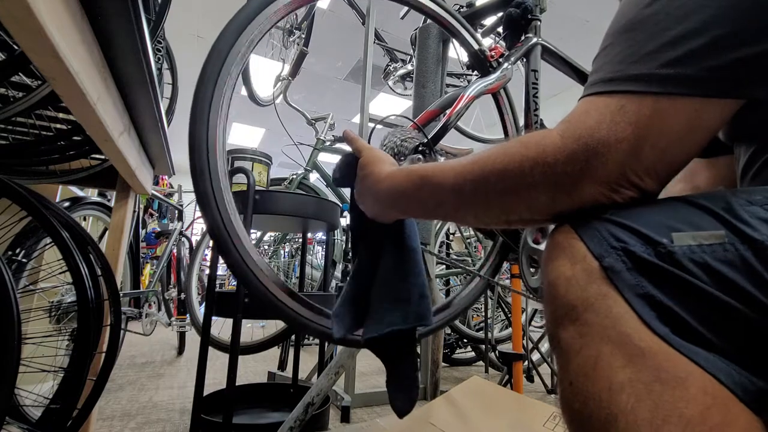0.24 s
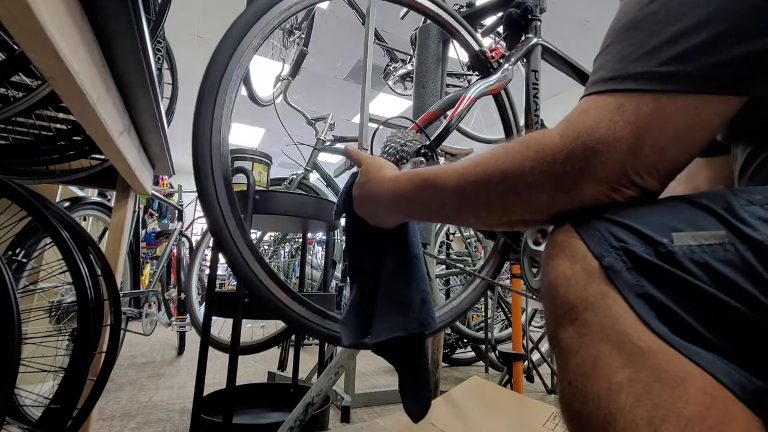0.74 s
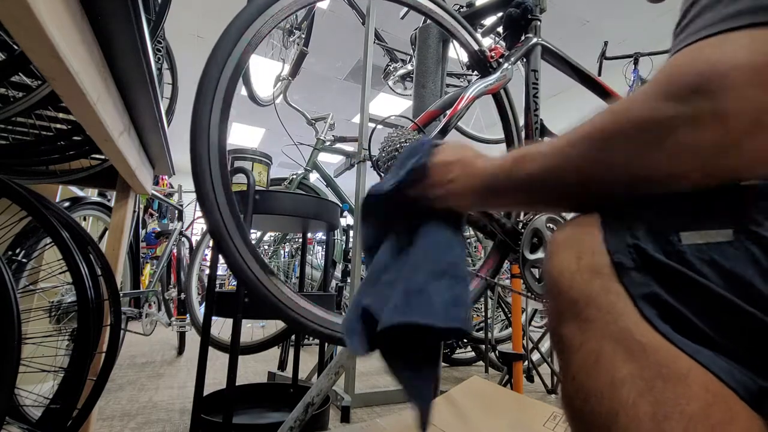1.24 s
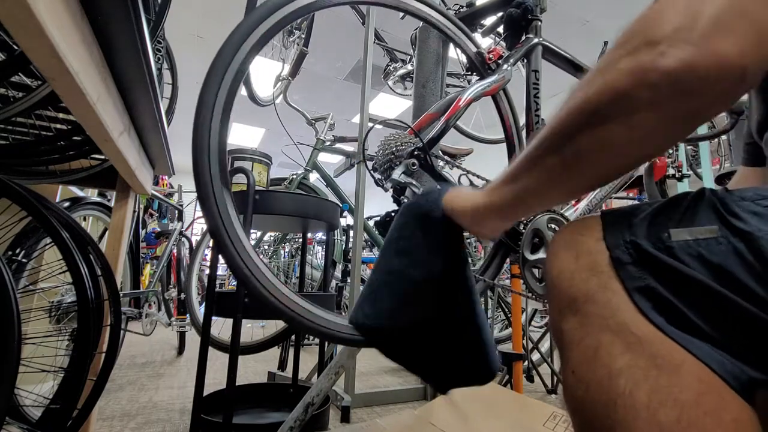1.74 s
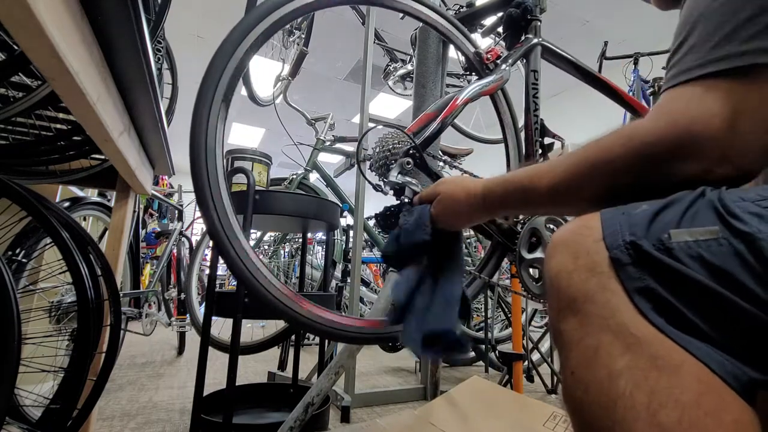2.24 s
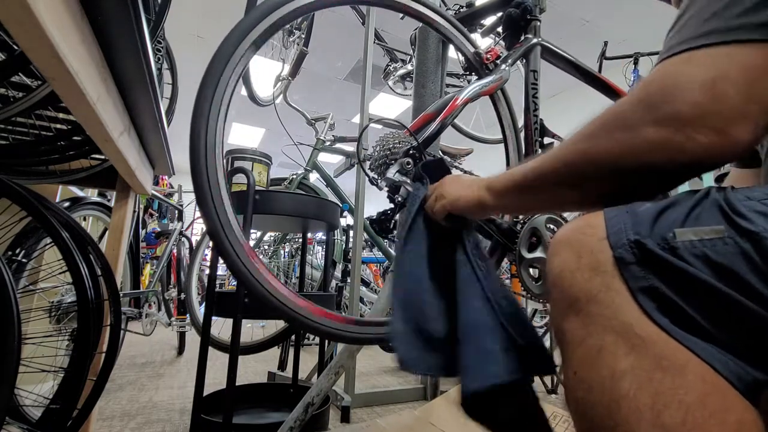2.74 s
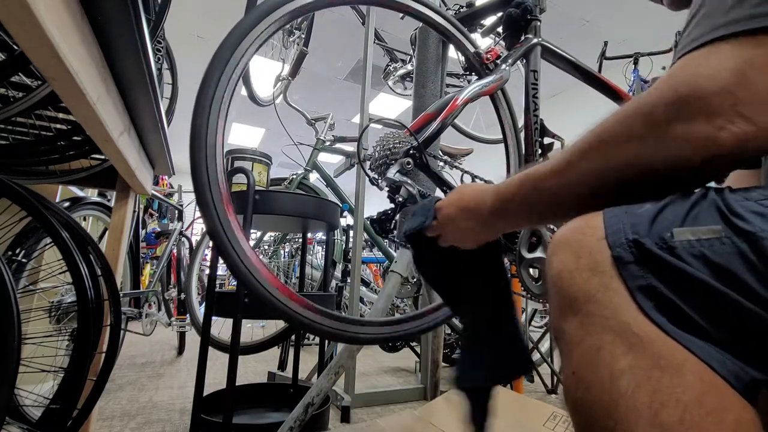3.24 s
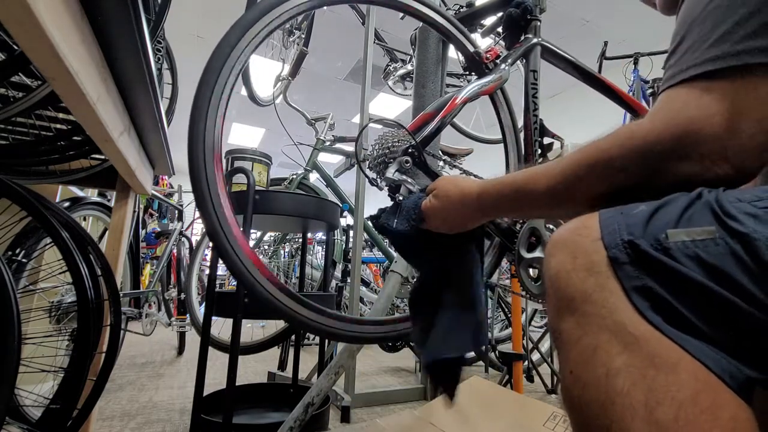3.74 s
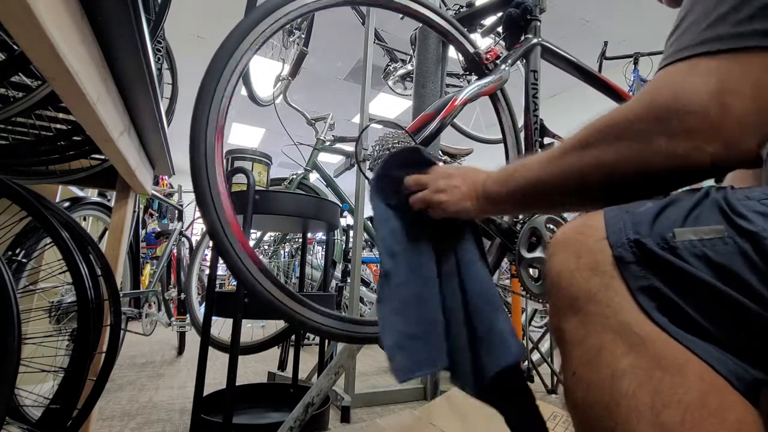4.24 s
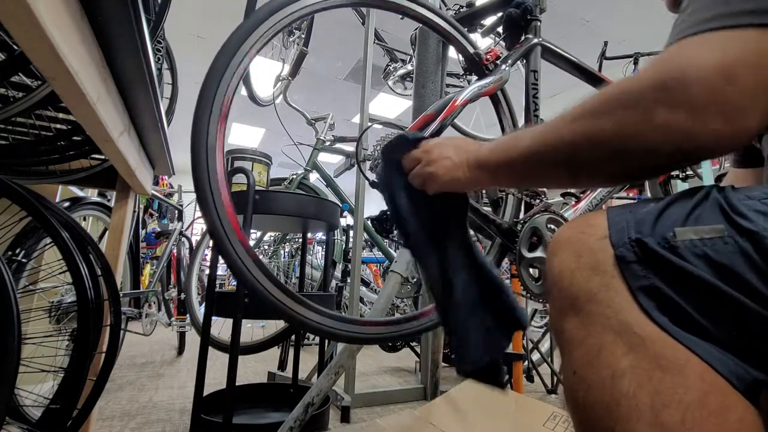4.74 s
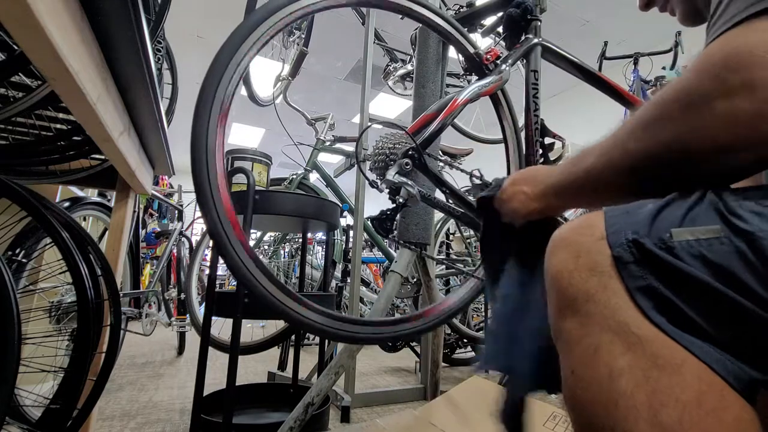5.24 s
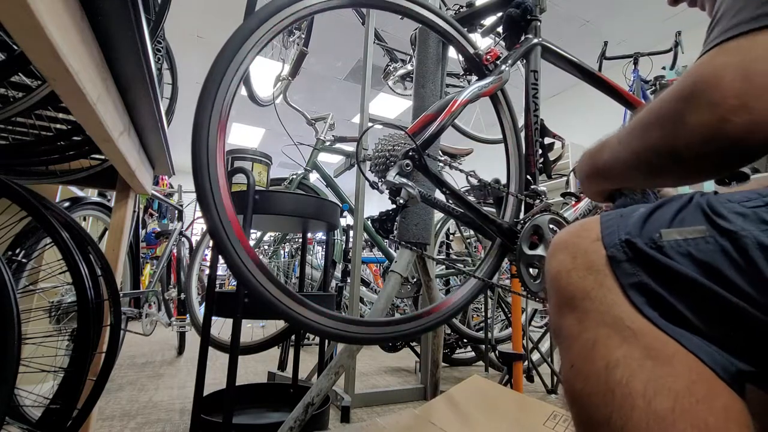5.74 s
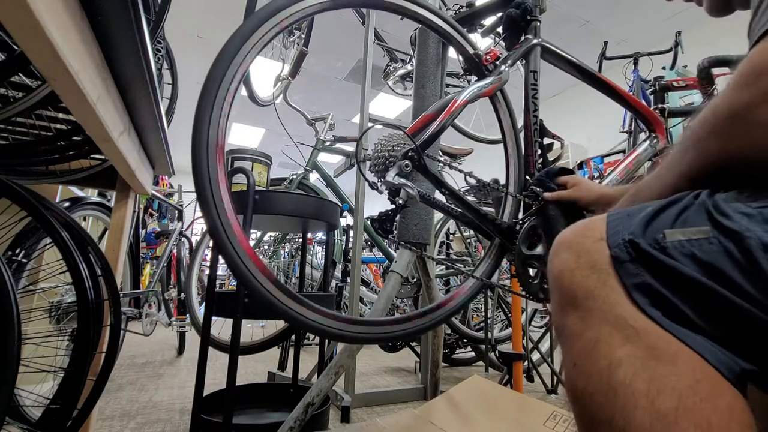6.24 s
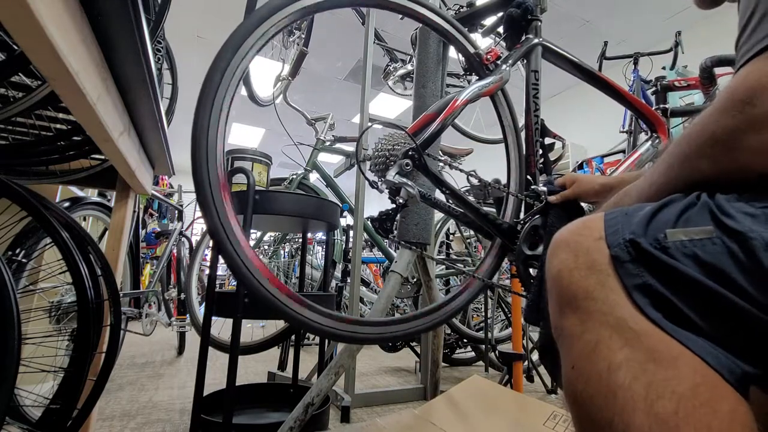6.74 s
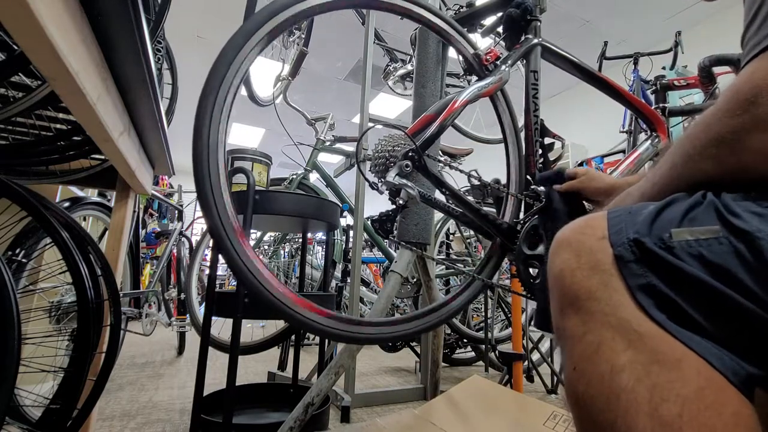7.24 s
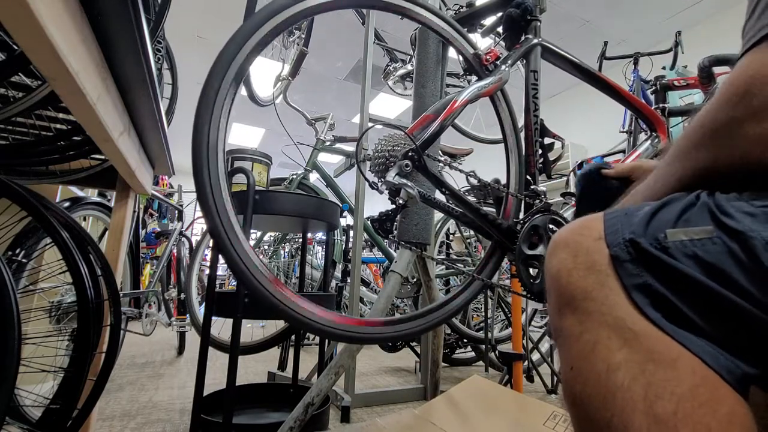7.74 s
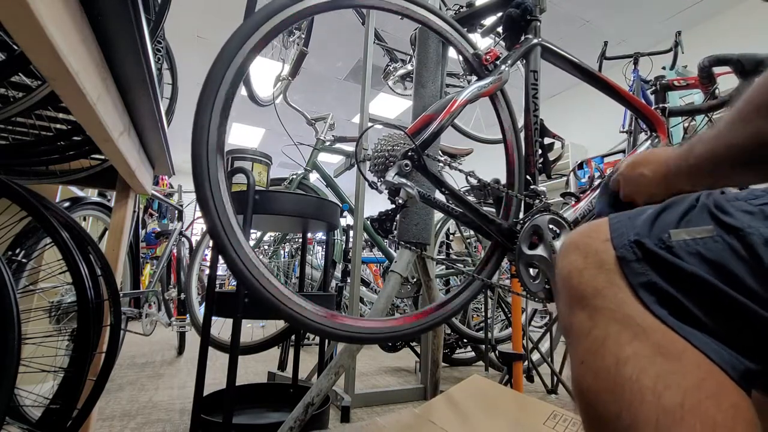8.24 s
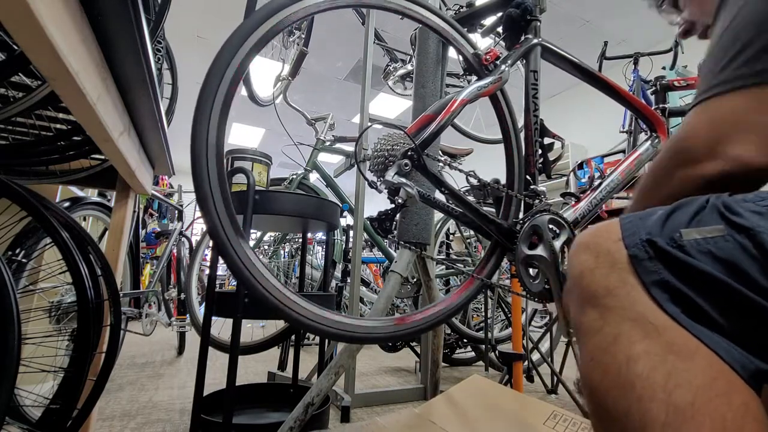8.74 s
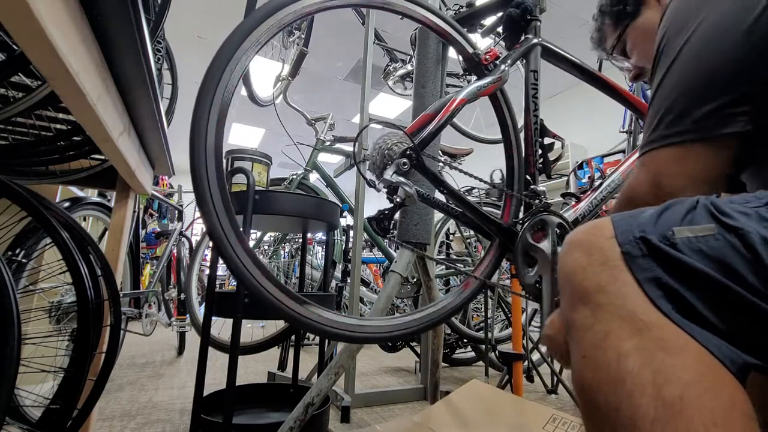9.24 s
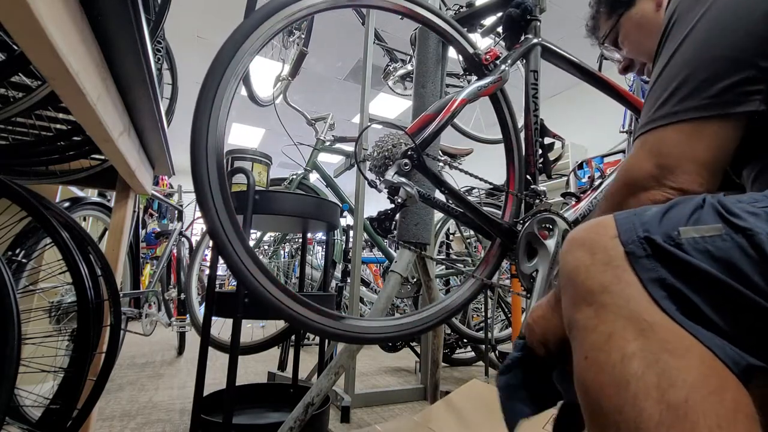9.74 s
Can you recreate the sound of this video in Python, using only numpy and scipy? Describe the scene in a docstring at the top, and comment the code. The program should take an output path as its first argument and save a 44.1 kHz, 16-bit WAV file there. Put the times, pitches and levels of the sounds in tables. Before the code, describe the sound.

Close, rapid ticking of a freewheeling bicycle hub, slowing briefly near the start and end, with faint rag rubbing and soft bumps.

```python
"""Bicycle freehub in a workshop

Close to a stereo pair, a rear wheel coasts on a repair stand: three pawls snap over a 30-tooth ratchet,
ringing hub, frame and spokes. A hand nudges the cassette to and fro; twice it drags it along and the
buzz slows towards single clicks. A rag rubs the drivetrain, bicycle and stand take a few bumps,
and the building rumbles underneath."""
import sys
import numpy as np
from scipy import signal
from scipy.fft import rfft, irfft
from scipy.io import wavfile
from scipy.ndimage import uniform_filter1d

SR = 44100
rng = np.random.default_rng(int(sys.argv[2]) if len(sys.argv) > 2 else 0)


def master_out(mix):
    """Clip the mix to full scale and print it as 16-bit PCM to the path in sys.argv[1]."""
    frames = np.transpose(np.atleast_2d(mix))
    ceiling = np.clip(frames, -1, 1)
    pcm = np.round(ceiling * 32767).astype(np.int16)
    wavfile.write(sys.argv[1], SR, pcm)


N = 440118
TIME = np.arange(N) / SR

# room tone of the building (frequency [Hz], relative level [dB])
RUMBLE_OUTLINE = [(20, -5), (35, -5), (55, -6.5), (100, -6.5), (130, -7), (150, -18.5), (250, -24),
                  (350, -22), (600, -28.5), (1500, -29.5), (5000, -9), (15000, -39.5)]
# resonances of the building (centre [Hz], width [Hz], rise [dB])
RUMBLE_RESONANCES = [(45, 3.4, 1.7), (73.5, 7.2, 11.5), (119.2, 2.3, 11.3), (206.5, 5.9, 9.9)]
# deep throbs in the room tone (middle [s], length [s], centre [Hz], level [dB])
DEEP_THROBS = [(.3, 1.7, 73, -51.5), (.96, 0.24, 42.2, -41.5), (1.85, 1.33, 42.3, -43.5),
               (2.6, 0.17, 41.5, -44.5), (3.3, 2.8, 40.3, -51), (3.55, 3, 106.4, -50.5),
               (5.65, 0.95, 73, -46), (6.9, 1.1, 78.5, -52)]
# rag on the drivetrain (middle [s], length [s], centre [Hz], level [dB])
RAG_STROKES = [(0.493, 0.087, 590, -50.5), (.48, 0.09, 1260, -50.5), (3.975, 0.045, 805, -53),
               (4.05, 0.26, 460, -58.5), (4.19, 0.12, 680, -57), (4.43, 0.12, 484, -56.5)]
# bumps against bicycle and stand (time [s], relative level [dB], treble tilt [dB/octave])
STAND_BUMPS = [(5.56, -46.5, 5), (5.579, -34.5, -6.5), (8.53, -52.5, 0), (9.927, -51.5, 3)]
# ring of the stand (frequency [Hz], relative level [dB], t60 [s])
STAND_RINGS = [(192.7, 3, 0.54), (236, 0, 0.39), (259, -1, 0.4), (350, -11, 0.16), (375, 1, 0.23),
               (465, -2, 0.22), (600, -9, 0.2), (795, -5, 0.18), (1135, -5, 0.11), (1278, -1.5, 0.11)]
# clear rings of the frame (frequency [Hz], level [dB], t60 [s])
FRAME_RINGS = [(749, -64, .25), (894, -63.5, .12)]
# broad colour of one click, close up (frequency [Hz], relative level [dB])
CLICK_OUTLINE = [(150, -27.5), (600, -32.5), (1300, -30), (1750, -16), (2300, -8.5), (2700, -12.5),
                 (3200, -6.5), (3550, -9.5), (4000, -8.5), (4600, -7.5), (4900, -5.5), (6200, -11),
                 (9000, -9.5), (11600, -11.5), (13600, -5.5), (15700, -5)]
# resonances of frame, sprockets and hub shell (centre [Hz], width [Hz], rise [dB])
CLICK_RESONANCES = [(799, 124, 13.5), (886, 200, 10), (1054, 29, 12), (1165, 32, 10), (1483, 220, 10.5),
                    (1974, 55, 12), (2135, 75, 12), (2416, 82, 10.5), (2577, 58, 11), (2673, 92, 16.5),
                    (2830, 56, 18), (3047, 79, 11), (3824, 130, 6), (4324, 130, 8.5), (7100, 204, 10),
                    (7760, 500, 0.5), (9550, 370, 9.5), (10610, 360, 10), (14650, 780, 4.5)]
# the left microphone hears more of the treble (frequency [Hz], left minus right [dB])
MIC_BALANCE = [(400, 4), (1000, -4.5), (1600, 0), (2100, -0.5), (2700, 1.5), (3700, 0), (6000, 1.5),
               (7000, -0.5), (8300, 15), (9200, 0.5), (10500, 2), (11500, 6), (13500, 4.5), (15500, 10.5)]
# pitch of the hub shell's ping, rising briefly early on and again near the end (time [s], pitch [Hz])
PING_PITCH = [(.25, 2850), (.4, 2970), (.75, 3060), (.9, 2816), (8.7, 2830), (9.1, 2960), (9.45, 3040),
              (9.98, 2880)]
# swell of the wheel's lower ring, near 2 kHz (rate [per turn], peak at [tooth], depth [dB])
LOWER_RING_LOBES = [(1, -.7, 2), (2, 4, 1.3), (3, -3, .8), (4, -2.9, .8)]
# swell of its main ring, near 2.8 kHz (rate [per turn], peak at [tooth], depth [dB before SWELL_DEPTH])
MAIN_RING_LOBES = [(1, 1.7, .6), (2, .7, 1.1), (3, -2.6, .7), (4, -1.9, 1), (6, -.8, .6), (7, .2, 1)]
# single surges and dips of the main ring (middle [s], length [s], level [dB before SWELL_DEPTH])
MAIN_RING_SURGES = [(.05, .1, 2), (.28, .25, -2.5), (.62, .1, -4), (.88, .15, 2), (1.1, .15, -3),
                    (1.24, .07, 2), (2.17, .15, -2), (2.9, .3, 2), (3.25, .08, 2), (4.92, .2, -2),
                    (5.24, .08, -2.5), (5.52, .12, 2.5), (6.03, .07, 2.5), (6.19, .12, 2.8),
                    (7.04, .08, 2.4), (7.35, .12, 2.2), (7.55, .07, 2), (8.37, .15, -2.2), (8.7, .15, -2),
                    (9.11, .08, 2), (9.44, .14, 2.7), (9.67, .12, -2.5), (9.92, .15, -2.3)]
# the hand turns the cassette: with the wheel (+) slows the buzz, against it (-) quickens it
# (fastest at [s], speeding up [s], slowing down [s], top speed [teeth/s])
HAND_TURNS = [(0.35, 0.266, 0.064, 36.68), (0.896, 0.285, 0.129, -16.11), (1.214, 0.323, 0.152, -17.33),
              (1.889, 0.08, 0.105, -2.65), (2.094, 0.149, 0.205, 3.58), (2.429, 0.128, 0.117, 2.52),
              (5.021, 0.343, 0.144, 4.29), (5.248, 0.151, 0.17, 7.63), (5.505, 0.099, 0.075, -5.69),
              (9.3, 0.191, 0.201, 43.8), (9.49, 0.144, 0.111, 14.27), (9.679, 0.039, 0.182, 16.56)]

TEETH, SWELL_DEPTH = 30, 0.85
ROOM_T60_S, TOP_HZ = .155, 15720


def amp(db):
    """Decibels to gain."""
    return 10 ** (np.asarray(db) / 20)


def unit(x):
    """Scale to rms 1."""
    return x / np.sqrt(np.mean(x ** 2))


def colour(f, points, peaks=()):
    """Level in dB at frequencies f: a broad outline with resonances on top."""
    hz, db = np.transpose(points)
    outline = np.interp(np.log(f + 1), np.log(hz), db)
    return outline + sum(rise / (1 + (2 * (f - centre) / width) ** 2) for centre, width, rise in peaks)


def filtered(x, hz, kind, order=2):
    """Butterworth filter."""
    return signal.sosfilt(signal.butter(order, hz, kind, fs=SR, output="sos"), x)


def fade(t, t60):
    """Exponential decay that loses 60 dB in t60."""
    return np.exp(-np.log(1000) * t / t60)


def hump(middle, length):
    """A bell curve in time, peaking at 1."""
    return np.exp(-(2 * (TIME - middle) / length) ** 2)


def impulses(times, sizes):
    """A train of single blows."""
    out = np.zeros(N)
    at = np.round(times * SR).astype(int)
    inside = (at >= 0) & (at < N)
    np.add.at(out, at[inside], sizes[inside])
    return out


def dense_ring(envelope, db, smooth_bins=41):
    """Dense modes: noise under an envelope, given the spectrum db by a causal filter."""
    spectrum = rfft(envelope * rng.standard_normal(len(envelope)))
    magnitude = np.sqrt(uniform_filter1d(np.abs(spectrum) ** 2, smooth_bins))
    cepstrum = irfft(np.log(amp(db) / magnitude))
    half = len(cepstrum) // 2
    cepstrum[1:half] *= 2  # minimum phase keeps the attack sharp
    cepstrum[half + 1:] = 0
    return irfft(spectrum * np.exp(rfft(cepstrum)))


def noise_swells(rows, spread):
    """Narrow bands of noise that rise and fade, one for each row."""
    out = np.zeros(N)
    for middle, length, hz, db in rows:
        band = unit(filtered(rng.standard_normal(N), [hz / (1 + spread), hz * (1 + spread)], "band"))
        out += amp(db) * band * hump(middle, length)
    return out


def building(level_db=-38.0, wide_hz=450, dull_hz=3000):
    """Dull rumble with deep throbs, alike at both microphones in the bass and diffuse above."""
    f = np.fft.rfftfreq(N, 1 / SR)
    mid, side = rfft(rng.standard_normal((2, N))) * amp(colour(f, RUMBLE_OUTLINE, RUMBLE_RESONANCES))
    side = side * f / np.hypot(f, wide_hz)
    rumble = amp(level_db) * unit(irfft(np.array([mid + side, mid - side]), N))
    return filtered(rumble + noise_swells(DEEP_THROBS, spread=0.12), dull_hz, "low", order=4)


def workshop(x, t60=0.3, wet_db=-3, size=22050):
    """Direct sound plus a diffuse room tail that differs at each microphone."""
    tails = rng.standard_normal((2, size)) * fade(np.arange(size) / SR, t60)
    tails /= np.linalg.norm(tails, axis=1, keepdims=True)
    return x + amp(wet_db) * np.array([signal.fftconvolve(x, tail)[:N] for tail in tails])


def rag():
    """A rag rubs the drivetrain: brief swells of friction, each around one pitch."""
    return noise_swells(RAG_STROKES, spread=0.26)


def bumps(thud_t60=0.25, thud_db=-3, thud_hz=(170, 1400), size=32768):
    """Dull knocks: a short thud and the ring of the stand, both darker the softer the contact."""
    t = np.arange(size) / SR
    f = np.fft.rfftfreq(size, 1 / SR)
    lowest_hz = STAND_RINGS[0][0]
    out = np.zeros(N)
    for start, db, tilt in STAND_BUMPS:
        modes = sum(amp(level + tilt * np.log2(hz / lowest_hz)) * fade(t, t60) * np.sin(2 * np.pi * hz * t)
                    for hz, level, t60 in STAND_RINGS)
        noise = irfft(rfft(rng.standard_normal(size)) * amp(tilt * np.log2(1 + f / lowest_hz)))
        thud = unit(filtered(noise, thud_hz, "band", order=3)) * fade(t, thud_t60)
        at = int(start * SR)
        out[at:at + size] += (amp(db) * (modes / 2 + amp(thud_db) * thud))[:N - at]
    return out


def wheel_speed(start_hz=67.41, slowing_s=44.56):
    """The free wheel loses a steady share of its speed; in teeth per second."""
    return start_hz * np.exp(-TIME / slowing_s)


def cassette_speed():
    """Each turn by hand eases in and out; in teeth per second."""
    return sum(top * np.sin(np.pi / 2 * np.interp(TIME, [at - rise, at, at + fall], [0, 1, 0])) ** 2
               for at, rise, fall, top in HAND_TURNS)


def teeth_passed(start=-.13):
    """Angle of the ratchet, wheel against cassette, counted in teeth."""
    return start + np.cumsum(wheel_speed() - cassette_speed()) / SR


def lobes(rows):
    """A pattern of level that comes round with the ratchet."""
    angle = teeth_passed()
    return sum(db * np.cos(2 * np.pi * count * (angle - peak) / TEETH) for count, peak, db in rows)


def main_ring_db():
    """Level of the wheel's main ring: its pattern round the turn, and single surges."""
    surges = sum(db * hump(middle, length) for middle, length, db in MAIN_RING_SURGES)
    return SWELL_DEPTH * (lobes(MAIN_RING_LOBES) + surges)


def turning(x, lower_hz=(1850, 2400), main_hz=(2400, 3350)):
    """The lower ring and the main ring each swell and sink as the wheel turns."""
    lower = (amp(lobes(LOWER_RING_LOBES)) - 1) * filtered(x, lower_hz, "band", order=1)
    main = (amp(main_ring_db()) - 1) * filtered(x, main_hz, "band", order=1)
    return x + lower + main


def hub_to_mics(drive, detune=0, build_hz=60, tail_db=4.3, top_damping_db=-2.8, size=16384):
    """One path to the pair: a brief metal crack, then spokes and room, where narrow rings build up."""
    t = np.arange(size) / SR
    f = np.fft.rfftfreq(size, 1 / SR)
    peaks = [(hz * (1 + detune * rng.standard_normal()), width, db) for hz, width, db in CLICK_RESONANCES]
    early_peaks = [(hz, width, db * width / (width + build_hz)) for hz, width, db in peaks]
    crack = colour(f, CLICK_OUTLINE, early_peaks)
    tail = colour(f, CLICK_OUTLINE, peaks) + tail_db + top_damping_db * (f / TOP_HZ) ** 2
    pan = colour(f, MIC_BALANCE) / 2
    strike = fade(t, t60=.022) + amp(-4) * fade(t, t60=.006)  # the first instant stands out
    responses = [dense_ring(strike, crack + side * pan, smooth_bins=301)
                 + dense_ring(fade(t, ROOM_T60_S), tail + side * pan) for side in (1, -1)]
    return np.array([signal.oaconvolve(drive, response)[:N] for response in responses])


def frame_rings(times, force, size=16384):
    """Two clear rings of the frame; each swells when a multiple of the ratchet rate slides across it."""
    t = np.arange(size) / SR
    pushes = impulses(times, force)
    return sum(amp(db) * unit(signal.oaconvolve(pushes, fade(t, t60) * np.sin(2 * np.pi * hz * t))[:N])
               for hz, db, t60 in FRAME_RINGS)


def frame_whirr(times, force, waver_s=.2, roughness_rad=.3):
    """The heavy frame feels one push a tooth; its whirr wavers between two paths to the microphones."""
    knots = np.arange(0, N / SR + waver_s, waver_s)
    drift = np.interp(times, knots, np.cumsum(rng.standard_normal(len(knots))))
    blend = drift + roughness_rad * rng.standard_normal(len(times))
    return sum(hub_to_mics(impulses(times, force * share)) for share in (np.cos(blend), np.sin(blend)))


def shell_ping(times, tooth, force, level_db=-41.5, build_s=0.00064, late_s=0.00026,
               echo_s=0.001845, echo_db=-3, scatter_db=2.0, spread_hz=70, size=512):
    """Each snap builds up a short ping in the hub shell, its pitch shifted by the tooth."""
    t = np.arange(size) / SR
    ping_db = np.interp(times, TIME, main_ring_db()) + scatter_db * rng.standard_normal(len(times))
    hz = np.interp(times, *np.transpose(PING_PITCH)) + spread_hz * rng.standard_normal(TEETH)[tooth]
    envelope = (force * amp(ping_db))[:, None] * (t / build_s) ** 2 * np.exp(-t / build_s)
    cycles = hz[:, None] * t
    at = times[:, None] + late_s + t
    direct = unit(impulses(at, envelope * np.sin(2 * np.pi * cycles)))
    echo_cycles = cycles + rng.random((TEETH, 1))[tooth]
    echo = unit(impulses(at + echo_s, envelope * np.sin(2 * np.pi * echo_cycles)))
    heard = workshop(direct, t60=ROOM_T60_S, wet_db=-6)
    heard[0] += amp(echo_db) * echo  # a reflection reaches only the left microphone
    return amp(level_db) * heard


def pawl_chatter(times, tooth, force, pawls=3, count=9, sectors=6, chatter_s=.0022, rebound_db=-3):
    """The pawls land one after another and rebound, in a pattern that each tooth repeats every turn."""
    late = np.sort(rng.random((TEETH, count)), axis=1)
    late -= late[:, :1]
    blows = amp(rebound_db * late) * rng.choice([-1, 1], (TEETH, count))
    blows *= .5 + rng.random((TEETH, count))
    blows /= np.linalg.norm(blows, axis=1, keepdims=True)
    at = times[:, None] + chatter_s * late[tooth]
    sizes = force[:, None] * blows[tooth]
    # each sector of the wheel rings a little differently, so the colour turns with the wheel
    pawl = np.arange(count) % pawls
    sector = (tooth[:, None] * sectors // TEETH + pawl) % sectors
    return sum(hub_to_mics(impulses(at, sizes * (sector == k)), detune=0.0063) for k in range(sectors))


def snap_level(times, start_db=-2, db_per_s=0.1588, following_db=-0.9):
    """Snap strength in dB: louder as the wheel runs down, softer while the cassette follows it."""
    following = np.interp(times, TIME, cassette_speed() / wheel_speed())
    return start_db + db_per_s * times + following_db * np.maximum(following, 0)


def ratchet(runout_s=.0003, tooth_error_s=.00005, uneven_db=0.58, scatter_db=1.03):
    """When each tooth passes, which one it is, and how hard the pawls drop off it."""
    passed = teeth_passed()
    click = np.arange(int(passed[-1]) + 1)
    tooth = click % TEETH
    # the ratchet sits a little off centre, so teeth come early and late once a turn
    runout = runout_s * np.sin(2 * np.pi * np.arange(TEETH) / TEETH)
    error = runout + tooth_error_s * rng.standard_normal(TEETH)
    times = np.interp(click, passed, TIME) + error[tooth]
    force_db = snap_level(times) + uneven_db * rng.standard_normal(TEETH)[tooth]
    force_db += scatter_db * rng.standard_normal(len(click))
    return times, tooth, amp(force_db)


def freehub(chatter_db=5.0, whirr_db=2.5, split_hz=2300):
    """The ratchet drives bright pawl chatter and the shell's ping over the frame's pitched whirr."""
    times, tooth, force = ratchet()
    chatter = amp(chatter_db) * filtered(pawl_chatter(times, tooth, force), split_hz, "high", order=3)
    whirr = amp(whirr_db) * filtered(frame_whirr(times, force), split_hz, "low", order=3)
    return turning(chatter + whirr) + shell_ping(times, tooth, force) + frame_rings(times, force)


def scene():
    """The freehub close to the microphones, handling noises at the stand, the building behind."""
    return freehub() + workshop(bumps() + rag()) + building()


def record(dry):
    """The recorder cuts the treble steeply above TOP_HZ."""
    return signal.sosfilt(signal.ellip(12, .2, 80, TOP_HZ, fs=SR, output="sos"), dry)


dry = scene()
out = record(dry)
master_out(out)
```